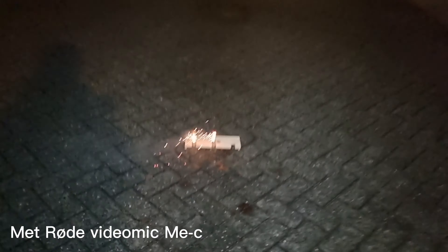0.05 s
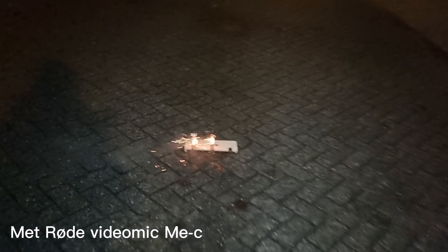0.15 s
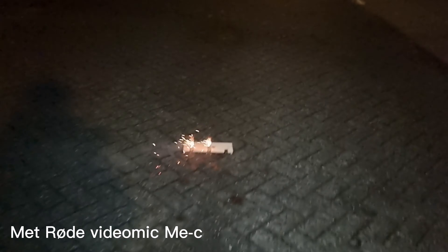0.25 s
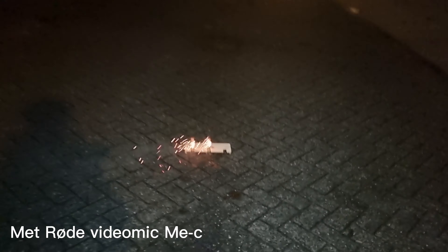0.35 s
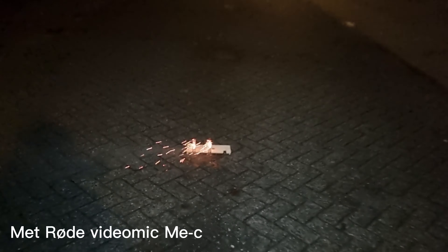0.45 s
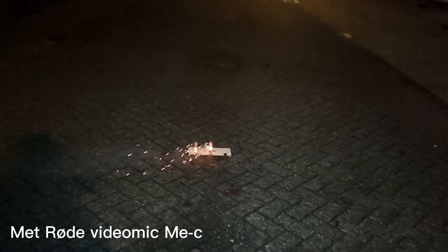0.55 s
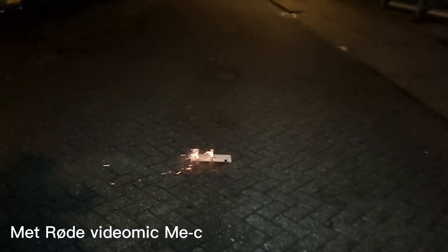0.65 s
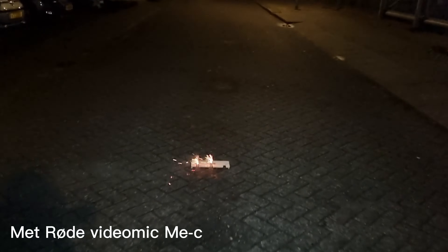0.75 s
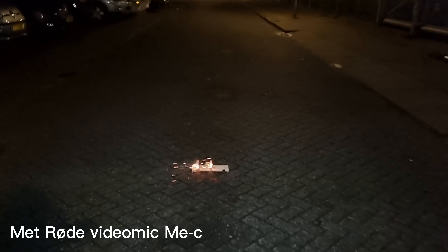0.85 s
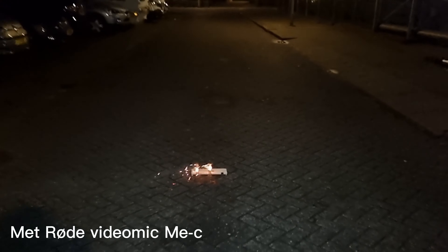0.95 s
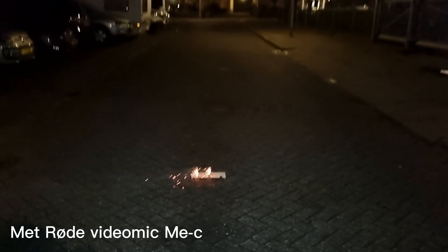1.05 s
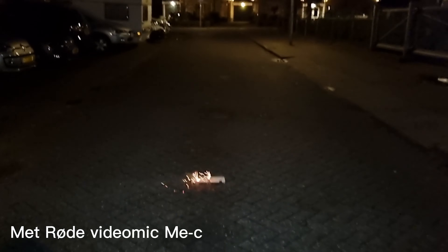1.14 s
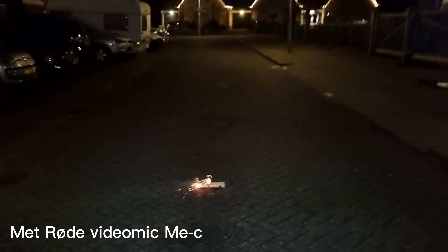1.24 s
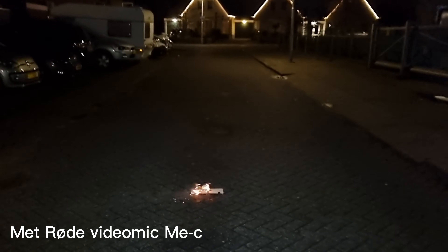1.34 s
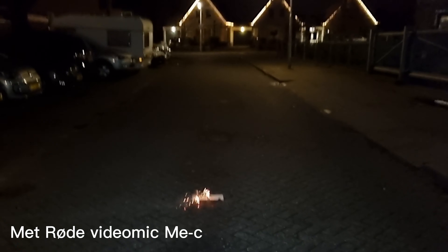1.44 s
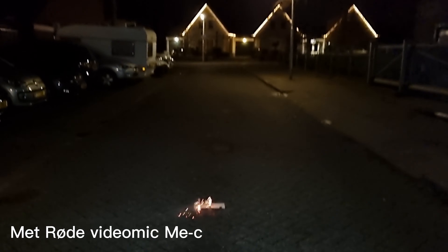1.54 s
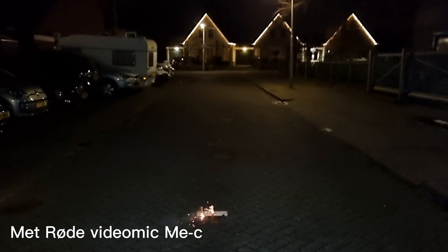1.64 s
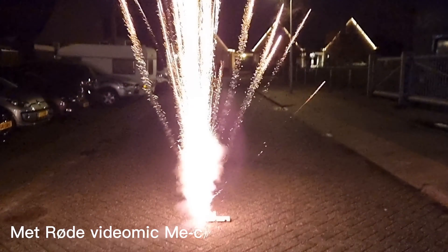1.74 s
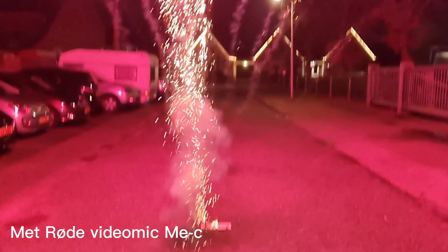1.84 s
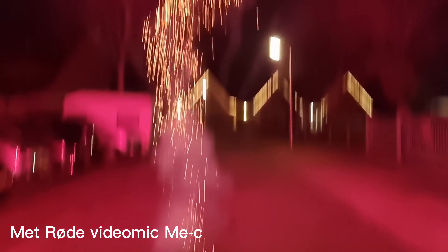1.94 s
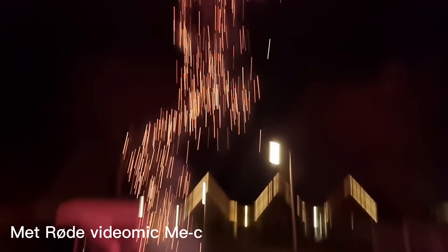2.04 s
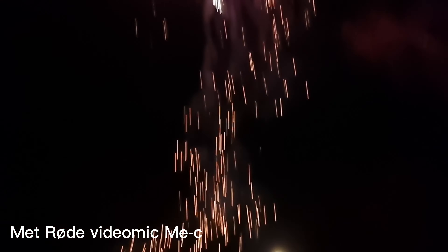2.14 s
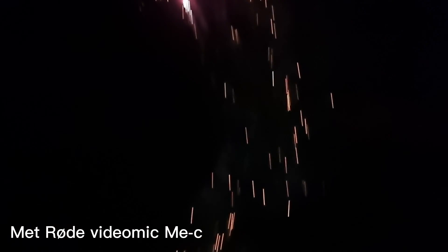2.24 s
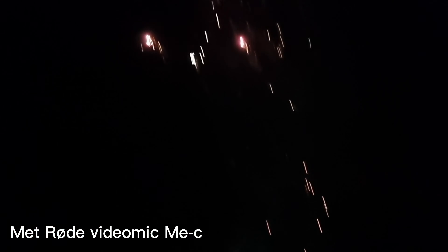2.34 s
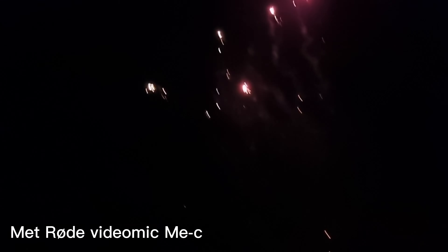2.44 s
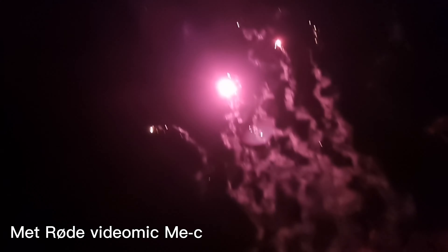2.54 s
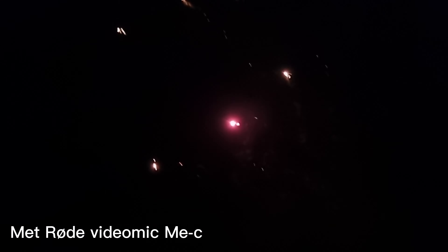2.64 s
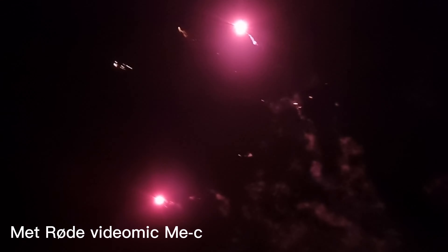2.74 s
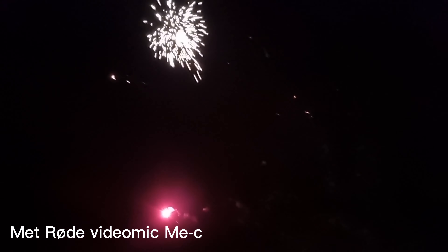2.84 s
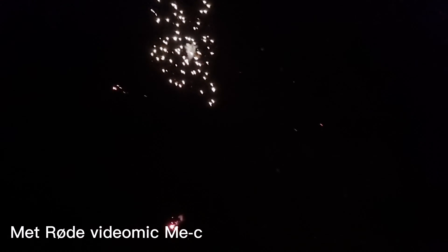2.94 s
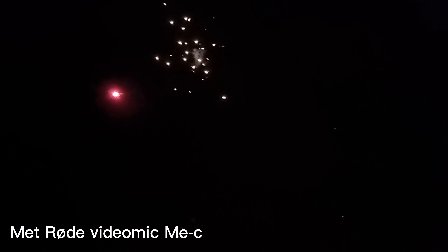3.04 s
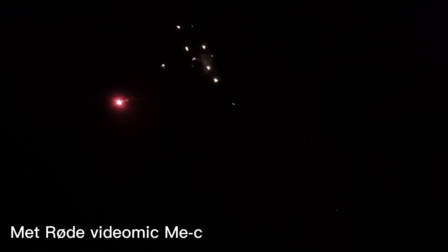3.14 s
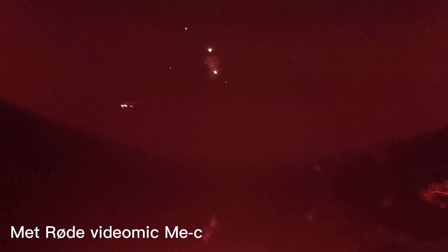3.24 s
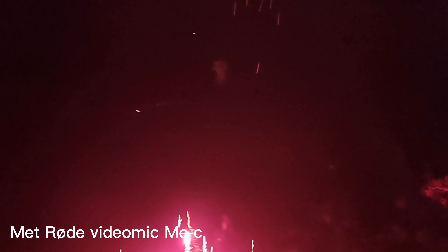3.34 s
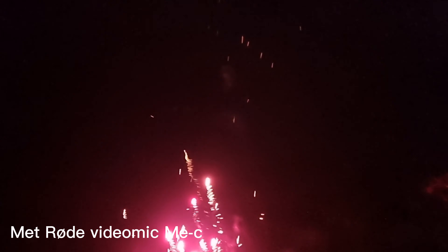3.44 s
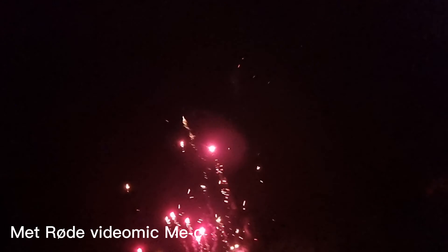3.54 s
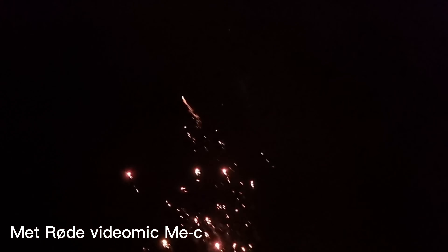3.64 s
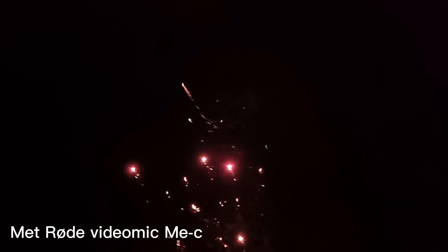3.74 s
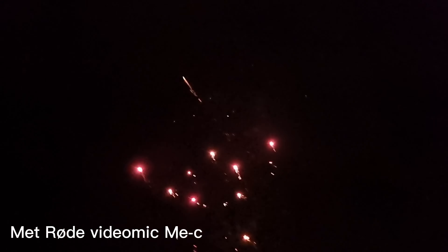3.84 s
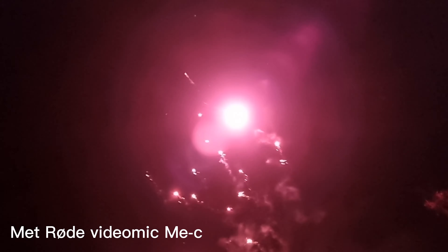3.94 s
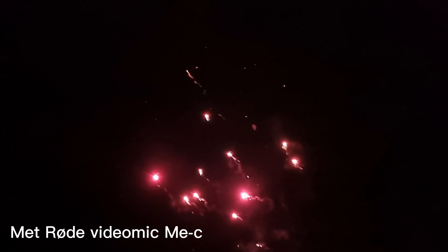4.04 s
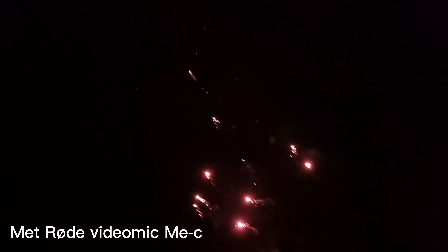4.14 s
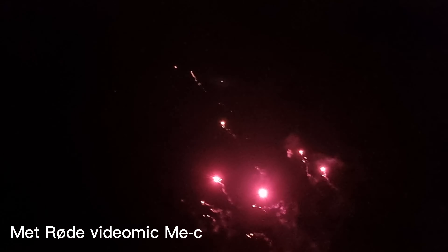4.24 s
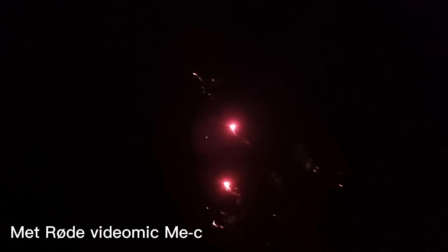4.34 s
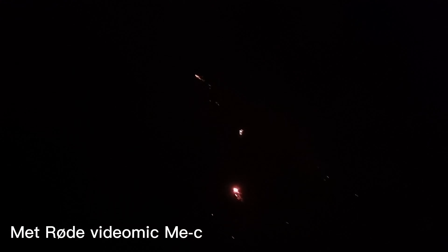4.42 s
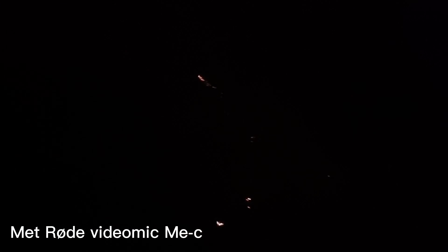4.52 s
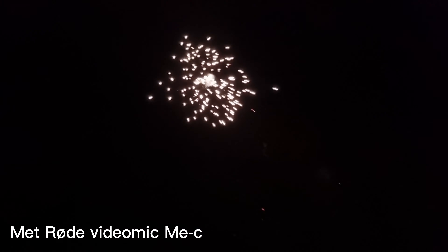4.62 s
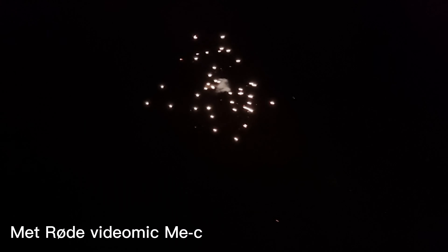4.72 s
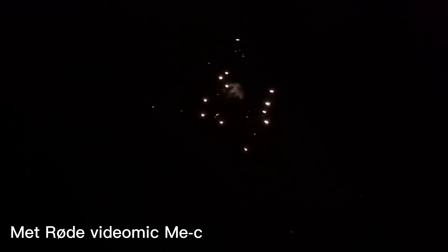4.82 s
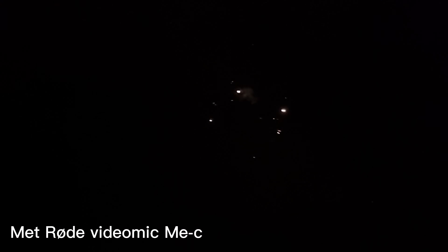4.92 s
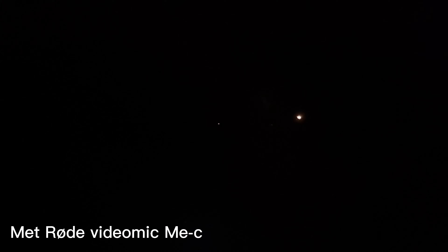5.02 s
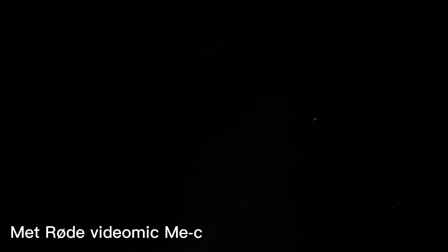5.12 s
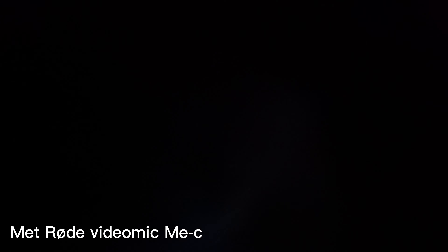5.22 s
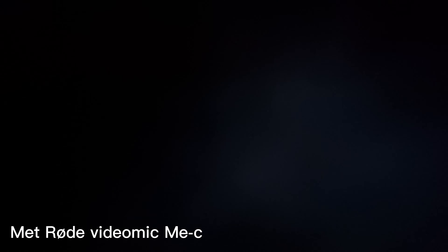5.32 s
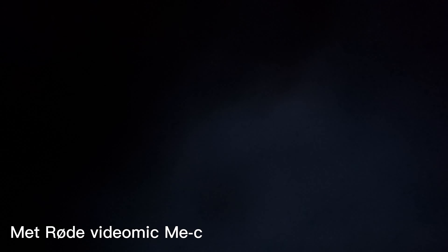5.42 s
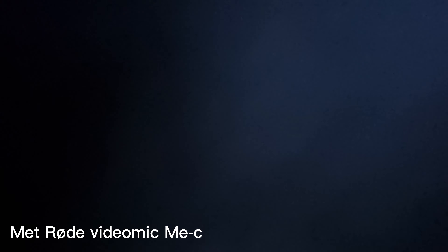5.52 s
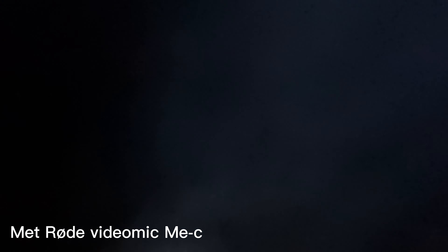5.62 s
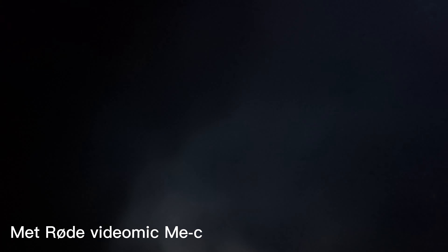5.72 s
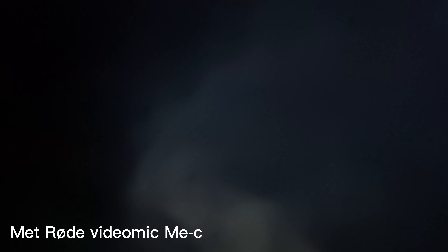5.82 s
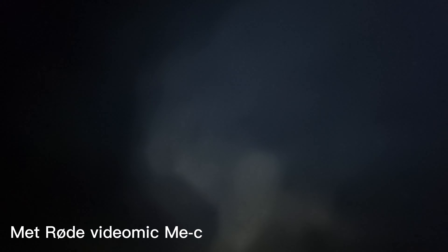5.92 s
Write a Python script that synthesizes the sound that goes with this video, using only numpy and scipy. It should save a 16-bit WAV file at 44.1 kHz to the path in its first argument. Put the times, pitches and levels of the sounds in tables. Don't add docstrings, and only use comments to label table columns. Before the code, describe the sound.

Two firework fuses fizz on a brick street at night, then four deafening overloaded bangs crack and roll between house fronts.

```python
import sys
import numpy as np
from scipy import signal
from scipy.fft import rfft, irfft
from scipy.io import wavfile
from scipy.ndimage import uniform_filter1d, minimum_filter1d

SR = 44100
rng = np.random.default_rng(int(sys.argv[2]) if len(sys.argv) > 2 else 0)


def unload_wav(signal):
    wavfile.write(
        sys.argv[1],
        SR,
        np.round(np.clip(np.atleast_2d(signal).T, -1, 1) * 32767).astype(np.int16),
    )


def level_to_linear(level):
    exponent = np.asarray(level, float) / 20
    return 10 ** exponent


N = 263277
TIME = np.arange(N) / SR

# f/Hz, level/(dB per Hz)
NIGHT_SPECTRUM = [(120, -35.5), (200, -8), (333, -1), (525, -1), (596, -1), (1980, -17.5), (3120, -22.5),
                  (14400, -44), (15500, -44.5)]
# t/s, level/dB
RUMBLE_LEVEL = [(0, -25.5), (.28, -30.5), (.42, -20), (.61, -27), (.85, -30.5), (1.54, -28.5), (2.25, -31),
                (2.55, -42), (2.65, -35), (3.45, -34), (3.66, -55), (3.85, -37.5), (5.25, -33.5),
                (5.97, -40.5)]
# f/Hz, level/(dB per Hz)
RUMBLE_SPECTRUM = [(8.8, -40.5), (15, -5), (32, 7), (87, -0.5), (237, -11), (288, -18), (400, -18),
                   (520, -51.5), (880, -120)]
# t/s, peak/dB, f/Hz
THUDS = [(0.017, -8, 150), (0.329, -6.5, 146), (.371, -7.5, 142), (.395, -7, 123), (.409, -8, 127),
         (0.425, -9, 134), (.454, -20, 132), (.977, -9, 229), (0.987, -9, 140), (1.233, -16, 116),
         (1.427, -19, 129), (1.58, -10, 78), (2.59, -17, 80.5), (2.618, -19, 81), (2.68, -19.5, 86),
         (4.203, -16, 61), (4.459, -15, 64), (4.487, -9.5, 70)]
# t/s, rise/ms, fall/ms, level/dB, centre f/Hz
RUSHES = [
    (1.12, 30, 33, -44, 2800),
    (1.19, 61, 56, -35.5, 2430),
    (1.674, 9.5, 4, -22.5, 3500),
    (5.53, 30, 39, -58, 2490),
    (5.635, 3, 6, -65, 5500),
    (5.89, 4, 6, -61.5, 6500),
    (5.944, 50, 120, -61.5, 8000),
]
# t/s, peak/dB, centre f/Hz, length/ms
KNOCKS = [
    (.028, -23, 220, 6),
    (.426, -24, 300, 4),
    (.977, -23, 130, 7),
]
# t/s, level/dB
FUSE_LEVEL = [(0, -35.5), (.3, -36.5), (1.62, -41), (2.12, -42.5), (2.83, -51), (3.5, -39.5), (3.75, -46.5),
              (3.97, -43.5), (4.42, -49), (4.455, -54), (4.48, -64), (4.57, -61), (4.62, -89.5)]
# f/Hz, level/(dB per Hz)
FUSE_FRONT = [(1180, -6), (2000, -8.5), (4040, -5.5), (6000, -8.5), (8800, 0.5), (10600, -7.5), (12300, -4),
              (15500, -5)]
# f/Hz, level/(dB per Hz)
FUSE_SIDE = [(1180, -42.5), (2000, -11.5), (3430, -3.5), (4440, -4), (5400, -2), (6300, -4.5), (8220, 0),
             (10700, -9.5), (14200, -7.5), (15500, -11)]
# t/s, notch f/Hz, share/0-1
BOUNCE = [(0, 3360, .5), (.35, 3800, 0.34), (.7, 4400, 0.3), (1.0, 5230, 0), (1.6, 6500, 0),
          (2.1, 6480, 0.22), (6, 6500, 0.06)]
# t/s, peak/dB
SPITS = [(2.2144, -28), (2.3535, -27), (2.3744, -24), (2.409, -26), (2.4947, -27), (2.54, -29),
         (2.7576, -29), (2.8085, -27), (3.3742, -20.5), (3.5863, -37), (3.7643, -19), (3.9429, -20),
         (4.0936, -28), (4.2544, -30)]
# t/s, peak/dB, length/ms
LAST_SPIT = (4.498, -19, 8)
SPUTTER_DB = [1.6, 3.0]
# f/Hz, level/(dB per Hz)
ROLL_SPECTRA = [
    [(120, -5.5), (200, 3), (427, -9), (463, -11.5), (1050, -12), (3000, -22), (3900, -33), (6600, -120)],
    [(88, -27.5), (150, -0.5), (236, 1.5), (469, -3.5), (718, -7.5), (895, -13), (4000, -28), (5200, -31.5),
     (8800, -120)],
    [(35, -49), (60, -52), (112, -3), (533, -11.5), (756, -13), (910, -11.5), (2780, -17), (8280, -26.5),
     (15500, -35)],
    [(35, -46.5), (60, -14.5), (226, -3), (351, -3.5), (423, -6.5), (642, -4), (1380, -13), (1870, -14),
     (3670, -20.5), (6410, -20), (15500, -37)],
    [(35, -40), (60, -2.5), (152, -5.5), (259, -4.5), (327, -5), (585, -8), (849, -5.5), (1200, -12),
     (2200, -14.5), (8870, -23), (15500, -36.5)],
    [(35, -44), (60, -11), (139, 1), (305, -0.5), (627, 0), (999, -3), (1480, -10.5), (1740, -9),
     (3670, -16), (6560, -16), (15500, -32)],
]
# f/Hz, extra level/(dB per s)
AGEING = [(60, 3.5), (250, 2), (600, -1.1), (1100, -2.5), (2000, -1), (4000, -14), (6000, -27), (8500, -44),
          (12000, -95), (16000, -110)]
AGEING_PACE = [0.8, 0.8, 0.77, 0.81]
CLUMP_DB = [0.796, 3.2, 3, 0.99, 2.7, 1.1]
# t after blast/s, level/dB
LAUNCH_ROLL = [(.010, -2), (.023, -0.5), (.16, -4.5), (.27, -14), (.4, -19), (.6, -28.5), (1.2, -51.5)]
# t after blast/s, level/dB
BURST_ROLL = [(.010, -13), (.017, -0.5), (.075, 1), (.19, -1), (.235, -6.5), (.325, -4), (.36, -9.5),
              (.9, -29), (1.4, -41)]
# in the sky/0-1, roll level/dB, walls level/dB, boom level/dB
STRENGTHS = [
    (0, -13, 0, -20.5),
    (1, -12, -2.5, -33),
    (0, -16.5, -6, -32.5),
    (1, -10, -5.5, -36.5),
]
# t after blast/s, peak/dB, f/Hz, length/ms
WHISTLES = [
    (.0355, -5, 5600, 1.2),
    (.350, -17, 2300, 7),
    (.364, -16.5, 2250, 6),
    (.383, -22, 2050, 4),
    (.466, -27, 2000, 9),
]
# t after blast/s, peak/dB, centre f/Hz, length/ms
LAUNCH_WALLS = [(.027, 2, 1800, 1.3), (.032, 2, 1600, 2), (.053, -1, 2505, .9), (.063, -3, 2400, 0.88),
                (.076, -6.5, 1403, 0.78), (.093, 0, 1355, .9), (.117, -8, 1160, 0.98),
                (.130, -12, 1590, .9), (.1465, -1.5, 1730, .9), (.157, -7, 1400, 1.4),
                (.186, -14, 1700, 0.68), (.203, -7, 1100, .9), (.277, -16, 1000, 1.2),
                (.345, -8.5, 145, 15), (.3448, -9.5, 1300, 1.4), (.3488, -6.5, 1780, 1.9),
                (.3577, -5.5, 990, 4.2), (.3658, -20, 2000, 0.85), (.3683, -7.5, 800, 3.0)]
# t after blast/s, peak/dB, centre f/Hz, length/ms
BURST_WALLS = [
    (.011, 1, 720, 1.4),
    (.02, -7, 835, 1.4),
    (.074, 5, 660, 2),
    (.162, -4, 780, 1.47),
    (.192, -7.5, 760, 1.5),
    (.234, -6.5, 710, 0.91),
    (.30, -11.5, 837, 1.5),
]
# t/s, peak/dB, centre f/Hz, length/ms
GAS = [
    (1.6772, -5, 3500, 2.0),
    (1.6894, -3, 3000, .8),
]
# t/s, ragged gas jet/ms, push/ms, pull/ms, sign of the push
BLASTS = [
    (1.6795, 3.0, .9, 6.5, 1),
    (2.8423, .15, 1.05, 10.6, 1),
    (3.0967, 4.3, 6.2, .4, 1),
    (4.5786, .12, 1.0, 10.8, 1),
]

NIGHT_DB, BLAST_DB = -46, 24
SPIT_MS, SPIT_RISE_MS = 6.2, 2.7
THUD_RING_S, THUD_RISE_S = 0.05, 0.0079
BOUNCE_TOP_HZ = 9000
FAR_ROLL_S, FAR_MURMUR_DB, FAR_ROLL_DB, FAR_SWELL_DB_PER_S = 1.15, -40, -33.5, 8.5
LUMP_RATE_HZ, LUMP_DB = 130, 3.0
BOOM_DB_PER_S, BOOM_LO_HZ, BOOM_HI_HZ = -23, 75, 190
BRICKS_S, BRICKS_DB = .0108, -3
RAIL, TOP_HZ = .92, 15480


def level(x, db):
    return x * level_to_linear(db) / np.sqrt(np.mean(x ** 2))


def shade(table, hz):
    table_hz, table_db = np.transpose(table)
    return np.interp(np.log(hz), np.log(table_hz), table_db)


def curve(table, since_s=0.):
    return np.interp(TIME - since_s, *np.transpose(table), left=-200)


def power_sum(curves_db):
    return np.sqrt(sum(level_to_linear(c) ** 2 for c in curves_db))


def walk(rate_hz):
    k = max(int(SR / rate_hz), 1)
    held = np.repeat(rng.standard_normal(N // k + 1), k)
    return 0.55 * uniform_filter1d(uniform_filter1d(held, k), k)[:N]


def band(x, lo_hz, hi_hz):
    sos = signal.butter(2, [lo_hz, min(hi_hz, .45 * SR)], "band", fs=SR, output="sos")
    return signal.sosfilt(sos, x)


def coloured(table):
    hz = np.maximum(np.fft.rfftfreq(N, 1 / SR), 1)
    return irfft(rfft(rng.standard_normal(N)) * level_to_linear(shade(table, hz)), N)


def add(out, s, piece):
    i = int(s * SR)
    out[i:i + len(piece)] += piece[:N - i]


def night():
    return level(coloured(NIGHT_SPECTRUM), NIGHT_DB)


def ground():
    out = level(coloured(RUMBLE_SPECTRUM), 0) * level_to_linear(curve(RUMBLE_LEVEL) + 2.9 * walk(15))
    t = TIME[:6000]
    shape = np.minimum(t / THUD_RISE_S, 1) * np.exp(-np.log(1000) * t / THUD_RING_S)
    for s, db, hz in THUDS:
        ring = np.sin(2 * np.pi * hz * t) + 0.19 * np.sin(2 * np.pi * 2.06 * hz * t)
        add(out, s, level_to_linear(db + 5.5) * ring * shape)
    return out


def rushes():
    out = np.zeros(N)
    for s, rise_ms, fall_ms, db, hz in RUSHES:
        shape = np.exp(-1000 * np.abs(TIME - s) / np.where(TIME < s, rise_ms, fall_ms))
        out += shape * level(band(rng.standard_normal(N), hz / 2.2, hz * 2.2), db)
    return out


def fuses():
    front, side = (coloured(c) for c in (FUSE_FRONT, FUSE_SIDE))
    front, side = (x / np.std(band(x, 7000, 10000)) for x in (front, side))
    before = TIME < BLASTS[0][0]
    flicker_db = 0.92 * walk(500) + 0.61 * walk(24) + np.where(before, *SPUTTER_DB) * walk(160)
    hiss = np.where(before, front, side) * level_to_linear(flicker_db)
    gain = level_to_linear(curve(FUSE_LEVEL))
    t_ms = 1000 * TIME[:2000]
    for s, db, ms in [(s, db, SPIT_MS) for s, db in SPITS] + [LAST_SPIT]:
        add(gain, s, level_to_linear(db - 14.5) * np.minimum(t_ms / SPIT_RISE_MS, 1) * np.exp(-t_ms / ms))
    s, notch_hz, share = np.transpose(BOUNCE)
    delay_s = .5 / np.interp(TIME, s, notch_hz)
    late = np.interp(TIME - delay_s, TIME, band(hiss, 300, BOUNCE_TOP_HZ))
    return gain * (hiss + np.interp(TIME, s, share) * late) * level_to_linear(-2.0)


def booms():
    fades_db = []
    for b, (_, _, _, db) in zip(BLASTS, STRENGTHS):
        fades_db.append(np.where(TIME > b[0], db + BOOM_DB_PER_S * (TIME - b[0]), -200))
    return level(band(rng.standard_normal(N), BOOM_LO_HZ, BOOM_HI_HZ), 0) * power_sum(fades_db)


def roll_gain():
    swell_db = FAR_ROLL_DB + FAR_SWELL_DB_PER_S * (TIME - FAR_ROLL_S)
    far_db = np.where(TIME < FAR_ROLL_S, FAR_MURMUR_DB, swell_db)
    rolls_db = [np.where(TIME < BLASTS[0][0], far_db, -200)]
    for b, (sky, db, _, _) in zip(BLASTS, STRENGTHS):
        rolls_db.append(db + curve(BURST_ROLL if sky > .5 else LAUNCH_ROLL, b[0]))
    return power_sum(rolls_db)


def rolls():
    starts = np.array([0, FAR_ROLL_S] + [b[0] for b in BLASTS])
    which = np.searchsorted(starts[1:], TIME)
    age = np.r_[0, 0, AGEING_PACE][which] * (TIME - starts[which])
    launch = (which == 2) | (which == 4)
    clump_db = np.array(CLUMP_DB)[which] * walk(300) + 1.0 * walk(50)
    clump_db = clump_db + LUMP_DB * launch * walk(LUMP_RATE_HZ)
    clumps = rfft(level(rng.standard_normal(N) * level_to_linear(clump_db), 0))
    per_octave = 4.6
    step = per_octave * np.log2(1 + np.fft.rfftfreq(N, 1 / SR) / 300)
    out, middle = np.zeros(N), np.zeros(N)
    for k in range(1, 28):
        hz = 300 * (2 ** (k / per_octave) - 1)
        young_db = np.array([shade(c, hz) for c in ROLL_SPECTRA])[which]
        gain = level_to_linear(young_db + shade(AGEING, hz) * age)
        window = np.cos(np.pi / 2 * np.clip(step - k, -1, 1)) ** 2
        out += gain * level_to_linear(2.0 * walk(35)) * irfft(clumps * window, N)
        if 400 < hz < 1500:
            middle += gain ** 2 * (hz + 300) * np.log(2) * 2 / per_octave / SR
    return out * roll_gain() / np.sqrt(middle)


def whistles():
    out, t = np.zeros(N), TIME[:2400]
    half_s = t[-1] / 2
    u = t - half_s
    bursts = [b[0] for b, strength in zip(BLASTS, STRENGTHS) if strength[0] > .5]
    for blast_s in bursts:
        for s, db, hz, ms in WHISTLES:
            rough = uniform_filter1d(rng.standard_normal(len(t)), size=int(4 * ms) + 8)
            uneven = level_to_linear(14 * rough * np.sqrt(ms))
            chirp = np.sin(2 * np.pi * hz * u * (1 - 30 * u / ms))
            tone = uneven * np.exp(-(1000 * u / ms) ** 2) * chirp
            tone = band(band(tone, hz / 1.5, hz * 1.5), hz / 1.5, hz * 1.5)
            add(out, blast_s + s - half_s, level_to_linear(db) * tone)
    return out


def slaps():
    out, t = np.zeros(N), TIME[:2400]
    cracks = [*GAS, *KNOCKS]
    for b, (sky, _, walls_db, _) in zip(BLASTS, STRENGTHS):
        walls = BURST_WALLS if sky > .5 else LAUNCH_WALLS
        cracks += [(b[0] + s, db + walls_db, hz, ms) for s, db, hz, ms in walls]
    for s, db, hz, ms in cracks:
        shock = np.r_[2., rng.standard_normal(len(t) - 1)] * np.exp(-1000 * t / ms)
        crack = band(band(shock, hz / 4, hz * 2.5), hz / 6, hz * 3)
        add(out, s, crack * level_to_linear(db) / np.abs(crack).max())
    return out


def brick_bounces():
    out, t = np.zeros(N), TIME[:2400]
    ping = np.sin(2 * np.pi * 11000 * t + 1) * np.exp(-t / .00015)
    for b in BLASTS:
        add(out, b[0] + BRICKS_S, level_to_linear(BRICKS_DB) * ping)
    return out


def blasts():
    out = np.zeros(N)
    for s, jet_ms, push_ms, pull_ms, sign in BLASTS:
        jet, push, pull = (int(ms * SR / 1000) for ms in (jet_ms, push_ms, pull_ms))
        ragged = uniform_filter1d(rng.standard_normal(400), size=3)[:jet]
        ragged[-7:] = -1
        add(out, s, sign * np.r_[ragged, np.ones(push), -np.linspace(1, 0, pull) ** 1.3])
    return out * level_to_linear(BLAST_DB)


def scene():
    background = night() + ground() + rushes() + fuses()
    echoes = booms() + rolls() + whistles() + slaps() + brick_bounces()
    return (background + echoes + blasts())[None]


def low_cut(x, hz, q):
    w = 2 * np.pi * hz
    return signal.lfilter(*signal.bilinear([1, 0, 0], [1, w / q, w ** 2], SR), x)


def band_limit(x):
    return signal.sosfilt(signal.butter(12, 16660, fs=SR, output="sos"), x)


def record(dry):
    x = np.clip(dry, -RAIL, RAIL)
    sag = signal.lfilter(*signal.butter(1, 520, fs=SR), x)
    x = low_cut(low_cut(x - .33 * sag, 62, 1.2), 24, .7)
    x = signal.sosfilt(signal.ellip(10, .2, 36, TOP_HZ, fs=SR, output="sos"), x)
    gain = minimum_filter1d(1 / np.maximum(np.abs(x), 1), size=9, axis=1)
    x = x * uniform_filter1d(gain, size=5, axis=1)
    return band_limit(x)


dry = scene()
out = record(dry)
unload_wav(out)
```